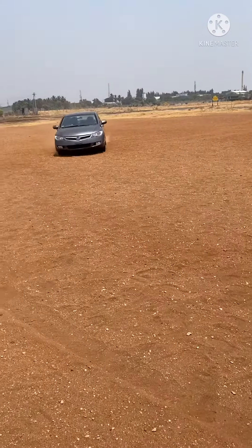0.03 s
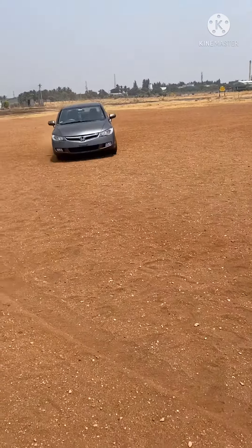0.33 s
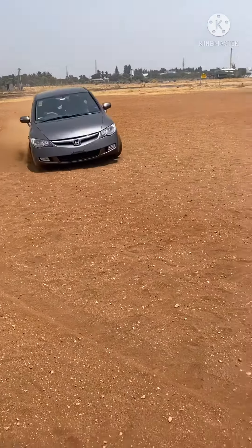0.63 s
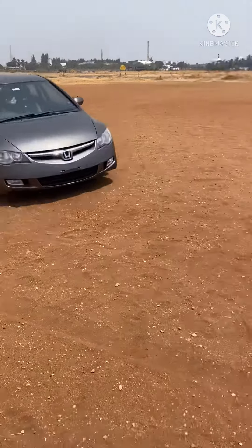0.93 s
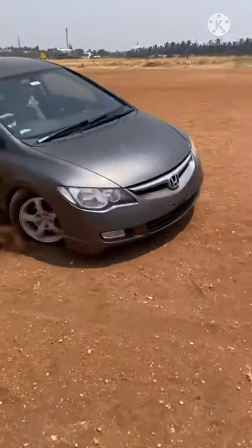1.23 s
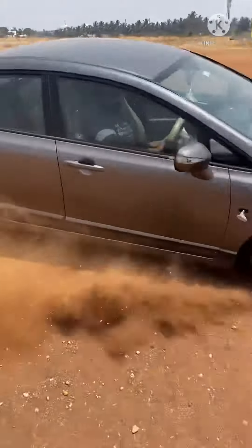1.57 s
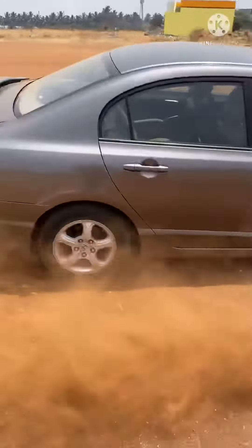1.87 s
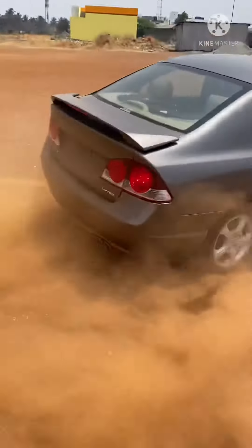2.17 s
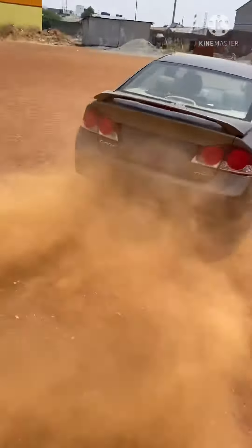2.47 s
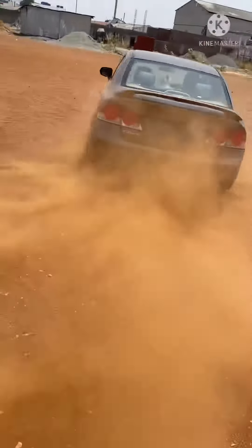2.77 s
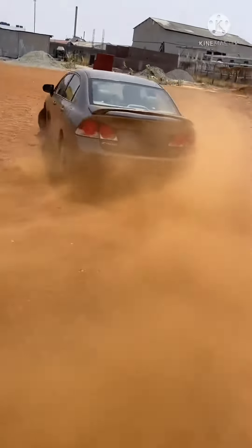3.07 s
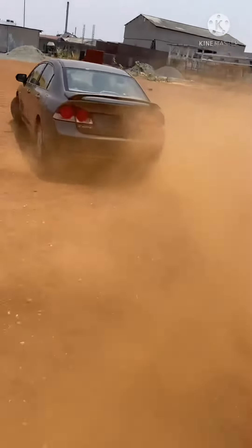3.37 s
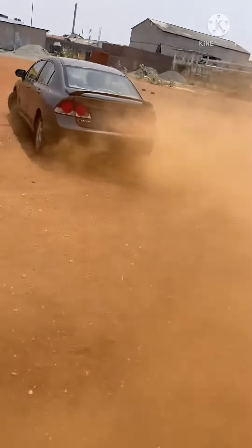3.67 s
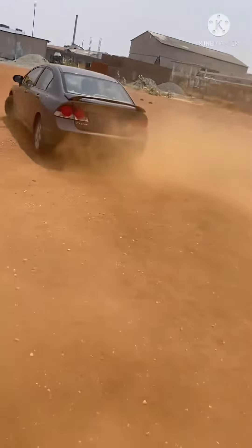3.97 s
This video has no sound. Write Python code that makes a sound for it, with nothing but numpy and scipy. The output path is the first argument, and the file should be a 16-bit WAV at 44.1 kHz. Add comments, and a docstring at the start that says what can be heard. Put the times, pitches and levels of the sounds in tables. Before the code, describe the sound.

A car skids by over crunching dirt, stones knocking, its revving engine winding down.

```python
"""An open field: a saloon car slides past on loose dirt, a few metres away.
Tyres rumble, crunch and spray grit, and stones knock on the underbody, among wind buffets and soft thuds.
The engine revs, then runs down to idle with its belt drive whining. Its firing pulses ring the
exhaust pipe, which booms as the tail swings round, and the dirt settles as the car slows."""
import sys
import numpy as np
from scipy import signal
from scipy.fft import rfft, irfft
from scipy.io import wavfile
from scipy.ndimage import uniform_filter1d

SR = 44100
rng = np.random.default_rng(int(sys.argv[2]) if len(sys.argv) > 2 else 0)


def transcribe(u):
    """Save the signal u as a 16-bit wav file named by the first command-line argument.

    u: samples, shape (n,) or (channels, n), limited to [-1, 1]; the rate is SR.
    q: integer samples, one column per channel.
    """
    v = np.clip(np.atleast_2d(u).T, -1, 1)
    q = np.round(v * 32767).astype(np.int16)
    wavfile.write(sys.argv[1], SR, q)


N = 176400
T = np.arange(N) / SR
F = np.maximum(np.fft.rfftfreq(N, 1 / SR), 1)

# engine speed, from rev to idle (time [s], firing rate [Hz])
FIRING_RATE = [(0, 186), (.14, 191), (.26, 205), (.38, 209), (.52, 194), (.72, 188), (.97, 168),
               (1.25, 141), (1.5, 119), (1.8, 89), (2.05, 64), (2.26, 43.2), (2.55, 30), (3.25, 30.5),
               (3.5, 29.5)]
# fades of the tyre rumble and of the crunching dirt (time [s], level [dB])
RUMBLE_FADE = [(0, -19), (.7, -25.5), (1.5, -18), (2.3, -24), (2.8, -24.5), (3.1, -33.5), (4, -39)]
CRUNCH_FADE = [(0, -30.5), (.35, -26.5), (1.1, -25), (1.65, -20), (2, -25.5), (2.8, -31), (3.3, -40),
               (3.5, -51)]
# bright tone of fine grit (frequency [Hz], gain [dB])
GRIT_EQ = [(1500, 7.5), (2500, 7.5), (3600, -0.5), (5200, 3.5), (7000, -1.5), (10500, -3.5), (16000, -15)]


def undb(db):
    """Decibels to gain."""
    return 10 ** (np.asarray(db) / 20)


def unit(x):
    """Scale to rms 1."""
    return x / np.sqrt(np.mean(x ** 2) + 1e-18)


def curve(table, at=T):
    """Read a two-column table along straight lines."""
    return np.interp(at, *np.array(table, float).T)


def colour(x, eq):
    """Equalise through (frequency [Hz], gain [dB]) points, then scale to rms 1."""
    hz, db = np.array(eq, float).T
    gain = undb(np.interp(np.log(F), np.log(hz), db))
    return unit(irfft(rfft(x) * gain, N))


def ring(x, hz, width):
    """One resonance, width in Hz, gain 1 at its centre."""
    return signal.lfilter(*signal.iirpeak(hz, hz / min(width, SR / 4), fs=SR), x)


def drift(hz):
    """Random wander with a spread near 1 and hz turning points a second."""
    knots = rng.standard_normal(1024)
    return 1.2 * np.interp(T * hz, np.arange(len(knots)), knots)


def burst(start, t60, attack):
    """Envelope of a blow: quick rise, exponential fall."""
    age = np.maximum(T - start, 0)
    return (1 - np.exp(-age / attack)) * np.exp(-np.minimum(np.log(1000) * age / t60, 50))


def shaped(x, envelope):
    """Lay an envelope on a sound whose rms under it is made 1."""
    return x * envelope * np.sqrt(np.sum(envelope ** 2) / np.sum((x * envelope) ** 2))


def swell(at, spread, db, hz, width):
    """A bell-shaped swell of narrow-band noise."""
    band = ring(ring(rng.standard_normal(N), hz, width), hz, width)
    return undb(db) * shaped(band, np.exp(-((T - at) / spread) ** 2))


def low_buffets_and_thuds():
    """Wind buffets, a low roar swells, and a few soft thuds sound."""
    low_swells = [(.02, 0.019, -14.5, 104), (.09, 0.033, -15.5, 86), (0.518, 0.058, -21, 253),
                  (1.57, 0.03, -20, 56), (2.09, 0.15, -21.5, 59.6), (2.159, 0.025, -21.5, 127),
                  (2.435, 0.0047, -12.5, 106), (2.69, 0.064, -25, 306)]  # (time [s], spread [s], level [dB], centre [Hz])
    return sum(swell(at, spread, db, hz, width=0.61 * hz) for at, spread, db, hz in low_swells)


def grit_ticks():
    """Single grains land close by, each a bright tick."""
    landings = [(0.658, -25), (1.605, -26), (1.764, -21), (1.993, -30), (2.44, -35)]  # (time [s], level [dB])
    bright = unit(ring(rng.standard_normal(N), hz=9800, width=11000))
    return bright * sum(undb(db) * burst(at, t60=0.016, attack=0.000075) for at, db in landings)


def rattle():
    """A short ratcheting train of metallic ticks swells and fades under the car."""
    start_s, length_s, ticks_per_s = 2.64, .125, 84
    age = T - start_s
    arch = np.sin(np.pi * np.clip(age / length_s, 0, 1))
    ratchet = np.exp(-(age * ticks_per_s % 1) / .35)
    metal = unit(ring(rng.standard_normal(N), hz=4300, width=500))
    return metal * ratchet * arch * undb(-30)


def tailpipe_spit(firings):
    """The idling exhaust spits gas once a firing, heard while the tailpipe faces the listener."""
    peak_s, spread_s, decay_cycles = 3.19, 0.23, 0.14
    gas = unit(ring(ring(rng.standard_normal(N), hz=6760, width=8200), hz=6400, width=5200))
    cycle = (firings - np.interp(peak_s, T, firings)) % 1
    facing = np.exp(-((T - peak_s) / spread_s) ** 2)
    return gas * np.exp(-cycle / decay_cycles) * facing * undb(-41.5)


def tyre_chirps():
    """The sliding tyres squeak briefly."""
    squeaks = [(1.06, .014, -21.5, 1720), (1.09, .018, -26, 1410)]  # (time [s], spread [s], level [dB], pitch [Hz])
    return sum(swell(at, spread, db, hz, width=130) for at, spread, db, hz in squeaks)


def underbody(x):
    """The floor panels ring in a few broad modes of alternating polarity."""
    modes = [(606, 114, 6), (900, 194, 4), (1300, 337, -2), (1757, 125, -5), (2270, 320, -17.5)]  # (frequency [Hz], width [Hz], gain [dB])
    return sum((-1) ** k * undb(db) * ring(x, hz, width) for k, (hz, width, db) in enumerate(modes))


def pebbles():
    """Stray pebbles patter on the underbody and click on the ground, louder as the tyres dig in."""
    def hits(per_s=40):
        return (rng.random(N) < per_s / SR) * rng.uniform(-1, 1, N)
    patter = unit(underbody(hits())) * undb(curve(CRUNCH_FADE) - 9)
    clicks = colour(hits(), GRIT_EQ) * undb(curve(RUMBLE_FADE) - 33)
    return patter + clicks


def stone_knocks():
    """Stones and clods crack against the underbody and ring its panels; short, hard blows crack most."""
    blows = [(1.357, -9.5, 870, 0.05), (1.676, -13, 880, 0.12), (1.773, -13.5, 900, 0.035),
             (1.794, -10, 760, 0.075), (1.947, -9, 650, 0.075), (2.119, -16, 1475, 0.09),
             (2.162, -16, 620, 0.055), (2.238, -11.5, 800, 0.085), (2.399, -12.5, 1000, 0.07),
             (2.592, -14.5, 1100, 0.034), (2.737, -15, 557, 0.08), (2.891, -18, 587, 0.04),
             (2.905, -8.5, 600, 0.055), (2.956, -17.5, 1430, .02), (3.118, -27, 1290, .03),
             (3.187, -10.5, 1400, 0.036), (3.214, -11.5, 1500, 0.065), (3.278, -28, 1070, .03),
             (3.377, -32, 1070, .03)]  # (time [s], relative level [dB], centre [Hz], 60 dB decay [s])
    attack_s, crack_t60_s = 0.00091, 0.022
    panel = underbody(rng.standard_normal(N))
    edge = ring(ring(rng.standard_normal(N), hz=1940, width=1700), hz=2570, width=SR / 4)
    out = 0
    for at, db, hz, t60 in blows:
        body = shaped(ring(panel, hz, width=hz), burst(at, t60, attack_s))
        crack = shaped(edge, burst(at, crack_t60_s, attack_s / 2))
        hardness = undb(-18.5) * np.sqrt(crack_t60_s / t60)
        out = out + undb(db + 0.5) * (body + hardness * crack)
    return out


def dirt_grains(eq, size_db, stereo_width):
    """Dense clicks of breaking dirt in stereo; size_db boosts or cuts the rare large grains."""
    def clicks(per_s=9000):
        hits = (rng.random(N) < per_s / SR) * rng.standard_normal(N)
        size = np.minimum(rng.exponential(size=N), 4)
        return colour(hits * undb(size_db * size), eq)
    mid, side = clicks(), clicks()
    return mid + stereo_width * side * np.array([[1], [-1]])


def tyres():
    """Sliding tyres rumble, crush the dirt and spray fine grit; crunch and spray surge together."""
    # tone of the low rumble and of the midrange crunch (frequency [Hz], gain [dB])
    rumble_eq = [(22, -36), (38, -7.5), (60, 1), (110, 2.5), (270, -6), (420, -15.5), (1500, -72)]
    crunch_eq = [(200, -9), (450, 4), (620, 10), (800, 6), (1200, 3.5), (1850, -5), (2600, -13),
                 (3400, -21.5), (7000, -41)]
    spray_fade = [(0, -31.5), (.65, -34), (1.1, -29), (1.62, -29), (1.95, -40.5), (2.5, -48), (3.25, -47.5),
                  (3.55, -61), (3.85, -61.5), (3.93, -51), (4, -57)]  # hiss of flying grit (time [s], level [dB])
    surge = drift(hz=34.93)
    rumble = dirt_grains(rumble_eq, size_db=0, stereo_width=.13)
    rumble *= undb(curve(RUMBLE_FADE) + 1.5 * drift(hz=24.61))
    crunch = dirt_grains(crunch_eq, size_db=3, stereo_width=.3)
    crunch *= undb(curve(CRUNCH_FADE) + 0.5 * surge)
    spray = dirt_grains(GRIT_EQ, size_db=-1, stereo_width=.22)
    spray *= undb(curve(spray_fade) + 1.3 * surge)
    return rumble + crunch + spray


def belt_whine(firings):
    """Engine and pulley whines track the engine speed and flutter; each fades in, holds and fades out."""
    whines = [(3, 0, .78, -32), (3, .23, .46, -33), (4, .88, 1.03, -27.5), (7, .45, .95, -32.5),
              (15, .7, .97, -35.5), (13.75, 1.23, 1.8, -30.5), (20.6, 1.25, 1.43, -38),
              (26.9, 1.3, 1.44, -42), (27.4, 1.58, 1.68, -39)]  # (pitch [x firing rate], start [s], end [s], level [dB])
    pitch_wobble, flicker_db, fade_s = .011, 2.2, .05
    slip = np.cumsum(curve(FIRING_RATE) * pitch_wobble * drift(hz=140)) / SR
    out = 0
    for order, start, end, db in whines:
        tone = np.sqrt(2) * np.sin(2 * np.pi * order * (firings + slip))
        gate = np.clip(np.minimum(T - start, end - T) / fade_s + .5, 0, 1)
        out = out + tone * gate * undb(db + flicker_db * drift(hz=80))
    return out


def exhaust_boom(firings):
    """Uneven firing pulses ring the low resonance of the exhaust pipe."""
    boom_fade = [(0, -40), (1.2, -39), (1.7, -40), (1.8, -17), (2.05, -26), (2.27, -18.5), (2.42, -29.5),
                 (2.8, -27.5), (3.45, -26.5), (4, -32.5)]  # (time [s], level [dB])
    pipe_hz, scatter_db, waver_db = 86, 1.9, 2.2
    pulses = np.diff(np.floor(firings), prepend=0) * undb(scatter_db * rng.standard_normal(N))
    pipe = ring(ring(pulses, pipe_hz, width=14), pipe_hz, width=99)
    running_rms = np.sqrt(np.maximum(uniform_filter1d(pipe ** 2, size=6000), 0) + 1e-14)
    return pipe / running_rms * undb(curve(boom_fade) + waver_db * drift(hz=20))


def engine(firings):
    """The firing note under a clatter of upper orders, each wavering alone, coloured by the engine bay."""
    # fades of the firing note and of the clatter (time [s], level [dB])
    note_fade = [(.17, -30), (.26, -21.5), (.43, -11.5), (.54, -36.5), (.66, -30), (.8, -20), (1.05, -20),
                 (1.3, -28), (1.65, -57), (4, -37)]
    clatter_fade = [(0, -27.5), (.38, -18), (.65, -20.5), (1, -16), (1.6, -32.5), (2.4, -38), (4, -51.5)]
    order_mix = [(1.5, -5), (2.5, -9), (3, -5), (3.5, -5), (4, -6), (5, -33), (6, 6.5), (7, -7), (8, 0.5),
                 (9, -2.5), (12, -1.5)]  # balance of the overtones (pitch [x firing rate], gain [dB])
    bay_eq = [(250, 12), (420, -1.5), (610, 11), (760, -2), (1250, -2), (2000, -2), (3500, -14),
              (7000, -16)]  # tone of the engine bay (frequency [Hz], gain [dB])
    note = np.sqrt(2) * np.sin(2 * np.pi * firings) * undb(curve(note_fade) + 2.0 * drift(hz=27.5))
    clatter = 0
    for order in np.arange(1.5, 32, .5):
        gain = undb(curve(order_mix, order) + 3.1 * drift(hz=5.6))
        phase = 2 * np.pi * (order * firings + rng.random()) + .3 * drift(hz=40)
        clatter = clatter + gain * np.sin(phase)
    return note + colour(clatter, bay_eq) * undb(curve(clatter_fade))


def scene():
    """One engine speed drives note, whines and exhaust; the dirt sounds around them."""
    firings = np.cumsum(curve(FIRING_RATE)) / SR  # running count of firing cycles
    motor = engine(firings) + belt_whine(firings) + exhaust_boom(firings) + tailpipe_spit(firings)
    slide = tyres() + tyre_chirps()
    debris = stone_knocks() + pebbles() + grit_ticks()
    return motor + slide + debris + low_buffets_and_thuds() + rattle()


def record(dry):
    """Two microphone ports spread the sound in phase and level; the deepest bass and the top are cut."""
    port_phase = [(340, 0), (950, 4.3), (1810, 6.1), (2930, 6.7), (5080, 6.4), (6980, 9.4), (8180, 9.8),
                  (9730, 12.4), (11600, 12.8), (12500, 15.5), (14500, 15.8), (15200, 18.6)]  # (frequency [Hz], lead of left over right [rad])
    port_balance = [(80, 1.14), (300, 4), (1290, 3), (2400, 1.5), (8000, 0)]  # (frequency [Hz], left minus right [dB])
    low_cut = signal.butter(2, 36, "high", fs=SR, output="sos")
    high_cut = signal.ellip(10, .2, 80, 15900, fs=SR, output="sos")
    sides = np.array([[.5], [-.5]])
    hz = np.fft.rfftfreq(2 * N, 1 / SR)
    ports = undb(sides * curve(port_balance, hz)) * np.exp(1j * sides * curve(port_phase, hz))
    stereo = irfft(rfft(dry, 2 * N) * ports)[:, :N]
    return signal.sosfilt(high_cut, signal.sosfilt(low_cut, stereo))


dry = scene()
out = record(dry)
transcribe(out)
```